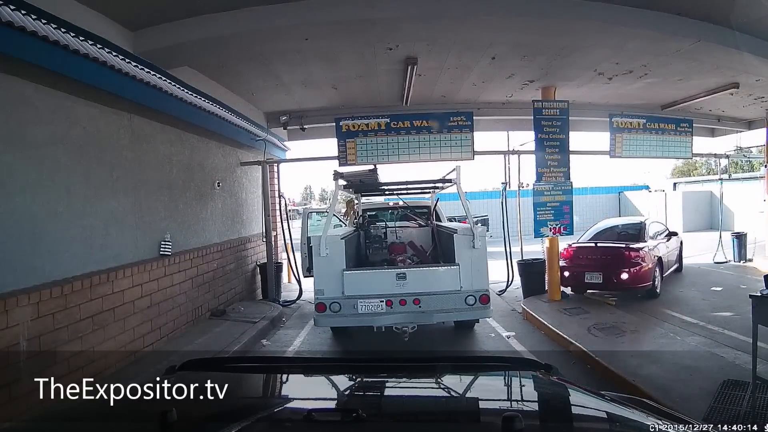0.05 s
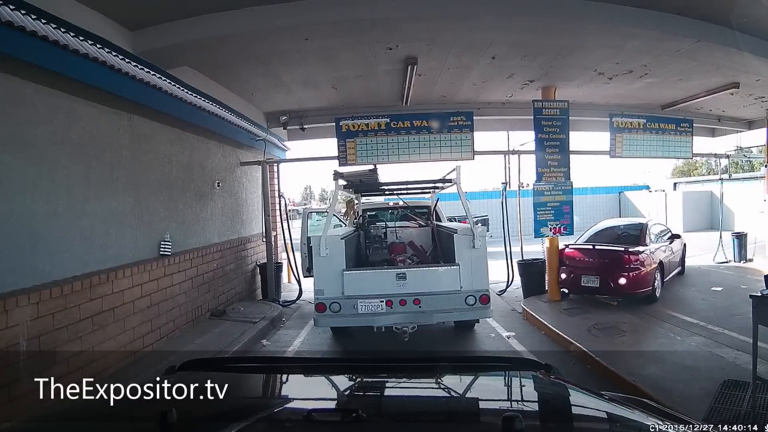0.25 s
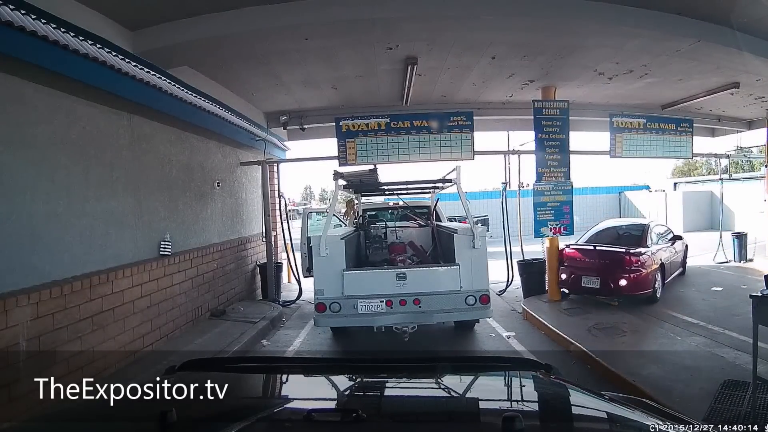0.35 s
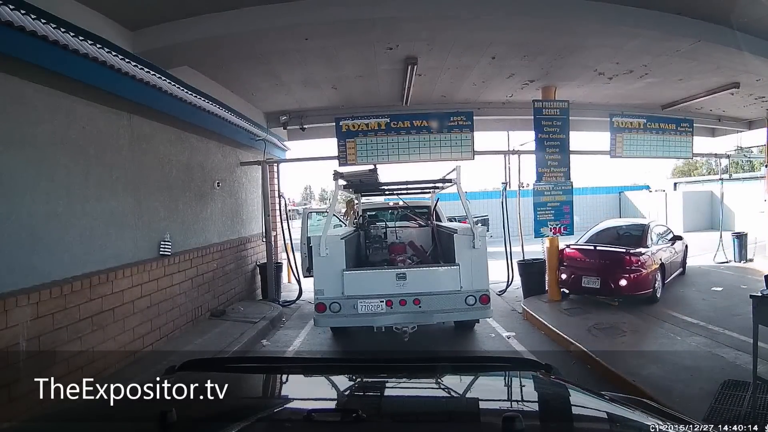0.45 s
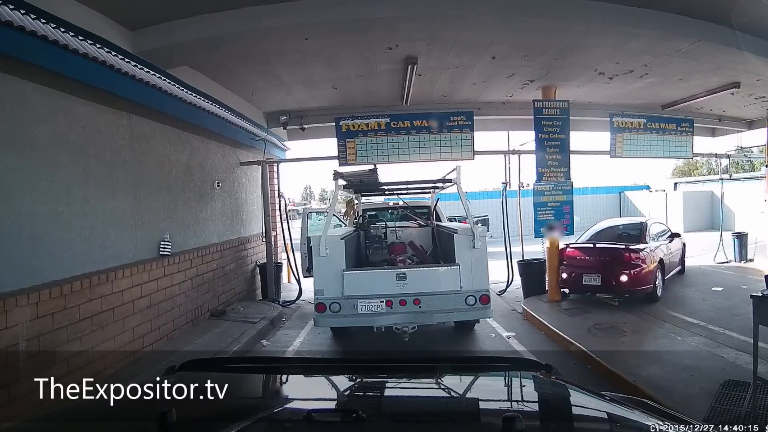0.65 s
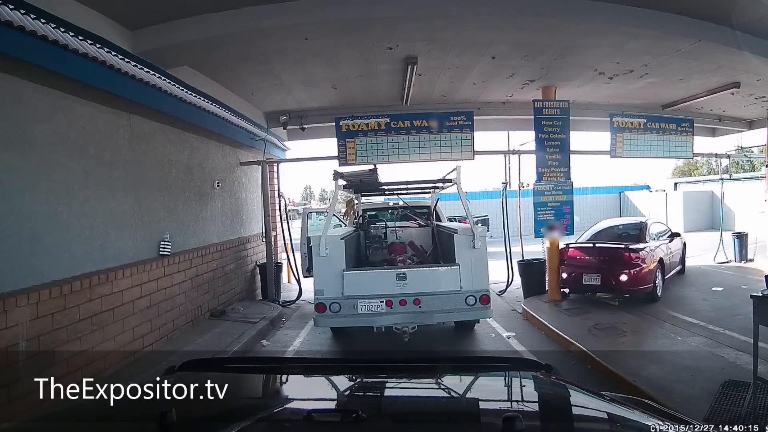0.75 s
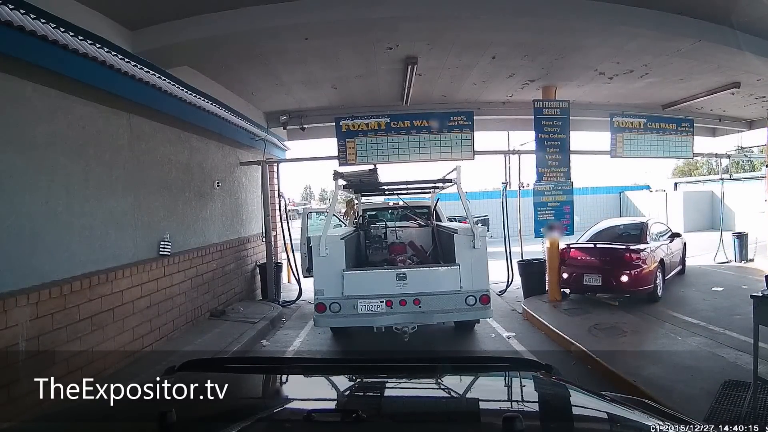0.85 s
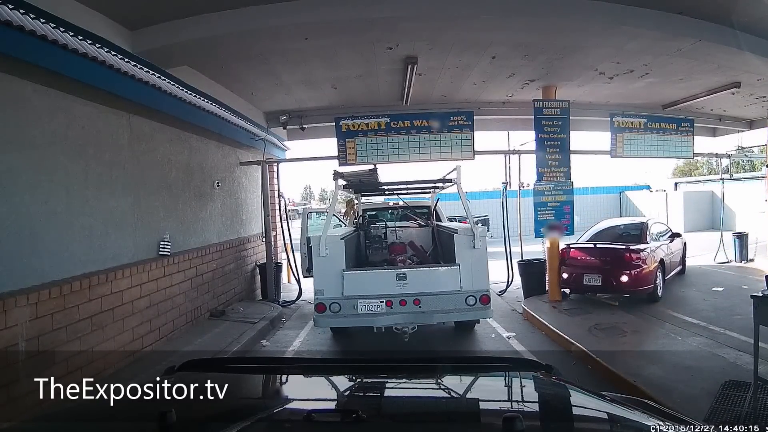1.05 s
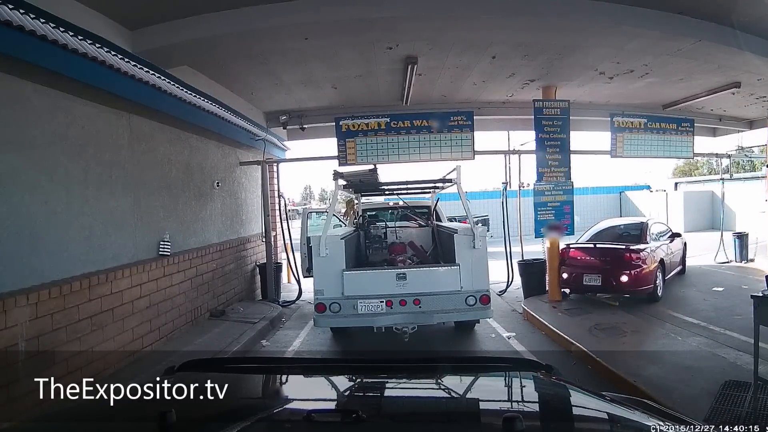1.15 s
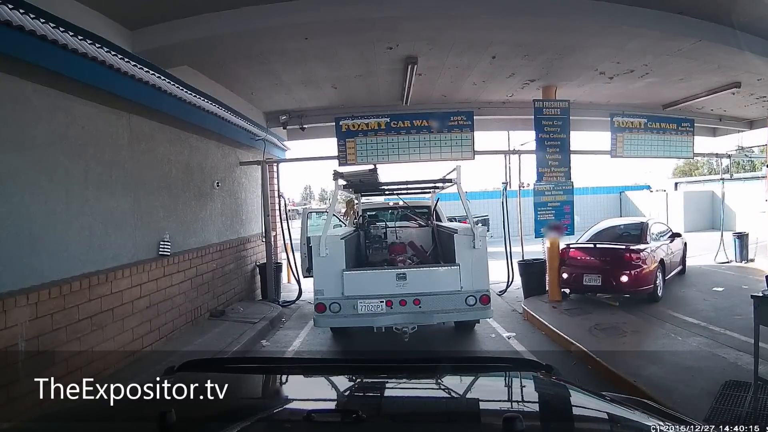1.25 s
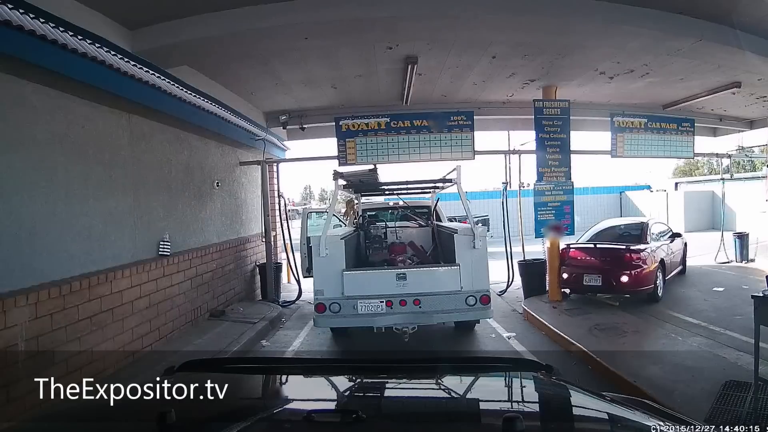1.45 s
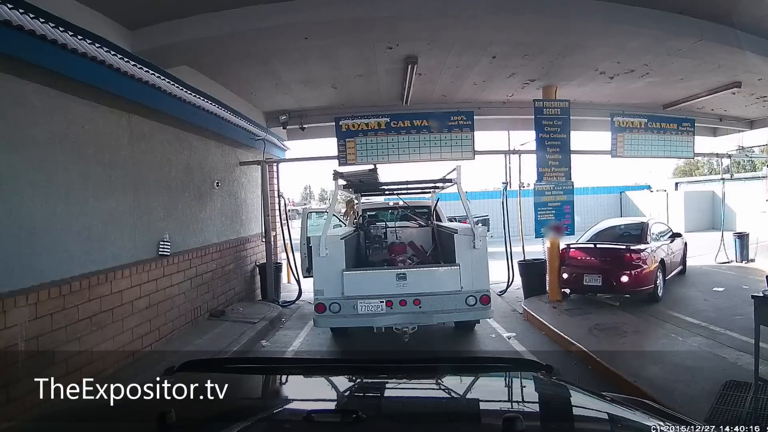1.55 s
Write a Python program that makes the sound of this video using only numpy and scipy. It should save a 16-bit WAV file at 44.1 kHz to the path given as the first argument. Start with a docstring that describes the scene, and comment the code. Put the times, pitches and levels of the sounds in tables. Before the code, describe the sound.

Muffled thumps ring the body panels of a vehicle waiting in a concrete wash bay, heard from the cabin. A lighter clatter with rustling comes next, then two faint knocks, while a low idle and hiss continue.

```python
"""A vehicle waits in a concrete wash bay, with the microphone inside the closed cabin.
From the start there is a low idle, a faint hum and the hiss of the microphone. A faint knock leads into
a dull double thump with a soft rustle and a low boom, and the vehicle rocks. A weaker clatter follows,
with more rustling and the ring of a loose hollow part, then two last faint knocks.
Each knock rings the body panels around the microphone and leaves a muffled rumble out in the bay."""
import sys
import numpy as np
from scipy import signal
from scipy.fft import rfft, irfft
from scipy.io import wavfile
from scipy.ndimage import uniform_filter1d

SR = 44100
rng = np.random.default_rng(int(sys.argv[2]) if len(sys.argv) > 2 else 0)


def bounce(signal):
    """Save signal as a 16-bit WAV file at the path given by the first command-line argument."""
    frames = np.transpose(np.atleast_2d(signal))
    limited = np.clip(frames, -1, 1)
    pcm = np.round(limited * 32767).astype(np.int16)
    wavfile.write(sys.argv[1], SR, pcm)


N = 70560  # 1.6 s


def amp(db):
    """Decibels to gain."""
    return 10 ** (np.asarray(db) / 20)


def unit(x):
    """Scales to rms 1."""
    return x / np.sqrt(np.mean(x ** 2) + 1e-20)


def read(points, hz):
    """Reads a table along a log-frequency axis."""
    table_hz, value = np.transpose(points)
    return np.interp(np.log(hz + 1), np.log(table_hz + 1), value)


def add(mix, start_s, sound):
    """Mixes a sound in at start_s."""
    part = mix[round(start_s * SR):][:len(sound)]
    part += sound[:len(part)]


def noise(spectrum):
    """Noise of rms 1; the spectrum's relative levels set only its colour."""
    gain = amp(read(spectrum, np.fft.rfftfreq(N, 1 / SR)))
    return unit(irfft(rfft(rng.standard_normal(N)) * gain, N))


def stereo_noise(spectrum, likeness):
    """Coloured noise in left and right; likeness 1 puts it dead centre."""
    mid = noise(spectrum) * np.sqrt((1 + likeness) / 2)
    side = noise(spectrum) * np.sqrt((1 - likeness) / 2)
    return np.array([mid + side, mid - side])


def band(centre_hz, width_hz):
    """Noise of rms 1 in one narrow resonance."""
    detune = (np.fft.rfftfreq(N, 1 / SR) - centre_hz) / width_hz
    return unit(irfft(rfft(rng.standard_normal(N)) / (1 + .5 * detune ** 2), N))


def wander(samples):
    """Random drift of rms 1, smoothed over this many samples."""
    return unit(uniform_filter1d(rng.standard_normal(N), size=samples))


# Machine murmur and low rumble in the cabin: frequency_hz, level_db
MURMUR_SPECTRUM = [(85, -24.5), (110, -8), (150, -6), (195, -14), (290, -5), (360, -8), (400, -12.5),
                   (470, -8), (580, -8), (720, -9.5), (800, -15), (950, -13.5), (1150, -20), (1400, -21),
                   (1600, -28.5), (3000, -41)]
LOW_RUMBLE_SPECTRUM = [(10, 3), (24, 5), (48, -5.5), (80, -8.5), (150, -19.5), (600, -45.5)]


def cabin_tone():
    """Machines murmur dead centre over a wider low rumble."""
    murmur = amp(-70) * stereo_noise(MURMUR_SPECTRUM, likeness=1)
    return murmur + amp(-69) * stereo_noise(LOW_RUMBLE_SPECTRUM, likeness=0.49)


# Noise floor of the microphone: frequency_hz, level_db
HISS_SPECTRUM = [(100, -4.5), (1800, -2.5), (3200, -1.5), (3700, 1), (4300, -1.5), (5000, -5), (8000, -2),
                 (12000, -3.5), (15000, -1.5)]


def microphone_hiss():
    """The microphone's own steady, wide hiss."""
    return amp(-75.5) * stereo_noise(HISS_SPECTRUM, likeness=0.27)


# Hum lines in the cabin: pitch_hz, level_db
HUM_LINES = [(156, -86.5), (560, -80), (715, -78)]


def idle_and_hum(idle_hz=40, idle_db=-76, waver_hz=1.6):
    """The low idle and the faint hum: tones that each waver in pitch."""
    out = np.zeros(N)
    for hz, db in HUM_LINES + [(idle_hz, idle_db)]:
        pitch_hz = hz + waver_hz * wander(samples=4000)
        out += amp(db) * np.sqrt(2) * np.sin(2 * np.pi * np.cumsum(pitch_hz) / SR)
    return out


def whine():
    """A thin, steady whine, barely above the hiss."""
    return amp(-87.5) * band(centre_hz=4485, width_hz=82)


def knock_colour(hz, boom_db, body_db, upper_db):
    """Tone of one knock: a shelf below 220 Hz, a hollow bump at 273 Hz, a shelf above 816 Hz."""
    low_shelf = 1 / (1 + (hz / 220) ** 8)
    bump = np.exp(-((hz - 273) / 92) ** 2)
    upper_shelf = 1 / (1 + (816 / (hz + 1)) ** 6)
    return amp(boom_db * low_shelf + body_db * bump + upper_db * upper_shelf)


CONTACT_S = 0.0042  # rise time of a padded blow
# Modes of the body panels around the microphone: pitch_hz, relative_level_db, t60_s
PANEL_MODES = [(126.3, -19, 0.27), (164.9, -7.5, 0.33), (195, -19, 0.16), (263, -3, 0.28),
               (308.3, -9, 0.093), (350.3, -1, .12), (450, -6.5, 0.33), (502.8, -6.5, 0.19),
               (568, -2.5, 0.1), (656.6, 1, .13), (729, 5, 0.086), (834, -2, 0.077), (1017, -3, 0.061),
               (1121.5, -11.5, 0.065)]


def panel_ring(tone, gain_db=-42, scatter_db=2.5):
    """A padded blow rings the panel modes, each with a chance strength and polarity."""
    t, ring = np.arange(N) / SR, np.zeros(N)
    for hz, db, t60_s in PANEL_MODES:
        strength, polarity = rng.standard_normal(2)
        envelope = amp(db + scatter_db * strength - 60 * t / t60_s)
        ring += envelope * knock_colour(hz, *tone) * np.sign(polarity) * np.sin(2 * np.pi * hz * t)
    return amp(gain_db) * (1 - np.exp(-t / CONTACT_S)) * ring


# The bay outside, heard through the closed cabin: frequency_hz, level_db
BAY_SPECTRUM = [(40, -30), (85, -39), (125, -8), (170, -10), (215, -4), (265, -0.5), (355, -2.5),
                (400, -14.5), (450, -4), (590, -1), (740, -3.5), (900, -10.5), (1120, -15), (1450, -25),
                (1950, -38.5), (3000, -42), (6000, -68)]
# Decay of its echo: frequency_hz, t60_s
BAY_DECAY = [(120, .6), (300, 0.89), (600, 1), (1200, 0.82), (3000, 1)]


def bay_rumble(tone, echo_gain_db=-46.5, echo_rise_s=0.011, shudder_gain_db=-43, shudder_fade_s=0.044):
    """A short dense shudder, then the long muffled echo of the concrete bay."""
    t = np.arange(N) / SR
    hz, frame_s, spectra = signal.stft(noise(BAY_SPECTRUM), SR, nperseg=1024)
    spectra *= knock_colour(hz, *tone)[:, None]
    fade = amp(echo_gain_db - 60 * frame_s / read(BAY_DECAY, hz)[:, None])
    echo, shudder = signal.istft(np.array([spectra * fade, spectra]), SR, nperseg=1024)[1][:, :N]
    echo *= 1 - np.exp(-t / echo_rise_s)
    shudder *= amp(shudder_gain_db) * (1 - np.exp(-t / CONTACT_S)) * np.exp(-t / shudder_fade_s)
    return echo + shudder


# Blows on the vehicle: start_s, relative_level_db, boom_db, body_db, upper_db
KNOCK_HITS = [(.055, -29, -1, 6.5, 6), (.205, -16.5, 5, 1.5, 2), (.217, -9, 11, 9.5, -1.5),
              (.232, -3.5, 4.5, 1, 7), (.264, -5.5, 6, 4, -18), (.288, -9, 0, 1.5, 7),
              (.309, 2, -0.5, -3.5, 0.5), (.331, -2, -1.5, -10.5, -3.5), (.347, -3.5, -4, -21, 1.5),
              (.385, -3.5, 0, 4, -2.5), (.413, -1.5, -4.5, -5, -2), (.438, -8.5, -1.5, -12.5, 0.5),
              (.462, -6.5, -5, -8, -6.5), (.496, -11, 7.5, 4.5, 2), (.635, -19.5, 3, -7, 2),
              (.688, -20, 5, 6.5, 6), (.720, -14.5, -9, -4.5, 7), (.741, -12, -4.5, 2.5, 4),
              (.771, -16, 1, -2, 2), (.801, -9.5, -10.5, -10.5, 5), (.841, -16.5, -7, 4, -3),
              (.880, -11, -4, 2, -5), (0.903, -15, -10.5, 0, -15), (1.050, -29.5, -19, -4, -4),
              (1.385, -34.5, -6, -3, 11)]


def knocks():
    """Each knock rings the nearby panels and sets the bay rumbling beyond them."""
    out = np.zeros(N)
    for start_s, db, *tone in KNOCK_HITS:
        add(out, start_s, amp(db) * (panel_ring(tone) + bay_rumble(tone)))
    return out


# Colour of the rustle at the microphone: frequency_hz, level_db
RUSTLE_SPECTRUM = [(900, -25), (1600, -4.5), (2000, -4), (2600, -4), (3500, -6), (4100, -2.5), (4480, 1.5),
                   (5000, -12.5), (5800, -7), (7200, -10), (8700, -4.5), (10500, -13.5), (12500, -20),
                   (15000, -50)]
# Swishes with the thump and the clatter: start_s, rise_s, level_db, fade_db_per_s
SWISHES = [(.208, 0.032, -73, 58), (.278, 0.05, -59, 92), (.380, 0.024, -73, 112),
           (0.621, 0.033, -77.5, 73), (.690, 0.048, -67.5, 88)]


def rustles(grain_db=1.0):
    """Soft, slightly grainy swishes that swell and die away."""
    t, out = np.arange(N) / SR, np.zeros(N)
    for start_s, rise_s, db, fade_db_per_s in SWISHES:
        level_db = db - fade_db_per_s * np.maximum(t - rise_s, 0) + grain_db * wander(samples=120)
        swell = np.minimum(t / rise_s, 1)
        add(out, start_s, noise(RUSTLE_SPECTRUM) * swell * amp(level_db))
    return out


# Low panel modes booming in the cabin: pitch_hz, level_db, t60_s
BOOM_MODES = [(168, -42.5, .42), (210.2, -47.5, 0.78)]


def panel_boom(start_s=.212, rise_s=0.019):
    """The first thump swells into two close panel modes that beat."""
    t, out = np.arange(N) / SR, np.zeros(N)
    ring = sum(amp(db - 60 * t / t60_s) * np.sin(2 * np.pi * hz * t) for hz, db, t60_s in BOOM_MODES)
    add(out, start_s, ring * (1 - np.exp(-t / rise_s)))
    return out


def body_rock(start_s=0.26, swell_s=.12, level_db=-66):
    """The vehicle rocks with the main thump: a deep swell around the microphone."""
    t, out = np.arange(N) / SR, np.zeros(N)
    swell = t / swell_s * np.exp(1 - t / swell_s)
    add(out, start_s, amp(level_db) * swell * band(centre_hz=48, width_hz=17))
    return out


# Rings of a loose part, heard from the cabin: start_s, level_db, pitch_hz
LOOSE_PART_RINGS = [(.745, -48, 767), (.775, -47.5, 619), (.799, -44.5, 678.6), (.808, -41.5, 715),
                    (.843, -46, 636)]


def loose_part(rise_s=0.0023, fade_s=0.012):
    """A loose hollow part gives short, softly started rings in the clatter."""
    t, out = np.arange(SR // 5) / SR, np.zeros(N)
    envelope = (1 - np.exp(-(t / rise_s) ** 2)) * np.exp(-t / fade_s)
    envelope /= envelope.max()
    for start_s, db, hz in LOOSE_PART_RINGS:
        add(out, start_s, amp(db) * envelope * np.sin(2 * np.pi * (hz * t + rng.random())))
    return out


def scene():
    """From inside the cabin, every event sits in the centre over the steady stereo background."""
    background = cabin_tone() + microphone_hiss() + idle_and_hum() + whine()
    return background + knocks() + rustles() + panel_boom() + body_rock() + loose_part()


# The recorder's constant offset, left then right: offset_full_scale
DC_OFFSET = [
    [-.0062],
    [.005],
]


def record(dry, cutoff_hz=15250):
    """The recorder adds its offset to each channel and cuts the highest treble."""
    lowpass = signal.firwin(511, cutoff_hz, window=("kaiser", 9), fs=SR)
    return signal.oaconvolve(dry + DC_OFFSET, lowpass[None], "same")


dry = scene()
out = record(dry)
bounce(out)
```